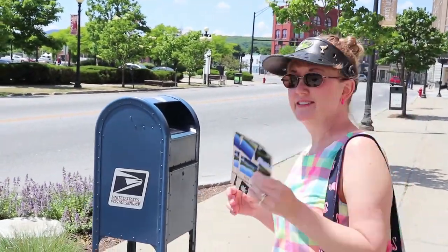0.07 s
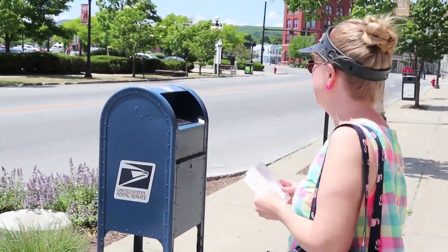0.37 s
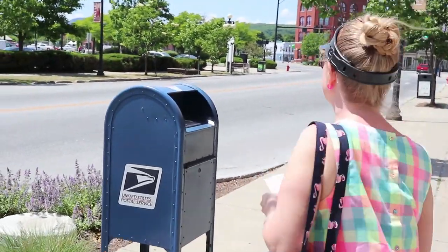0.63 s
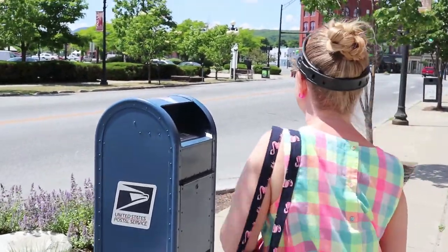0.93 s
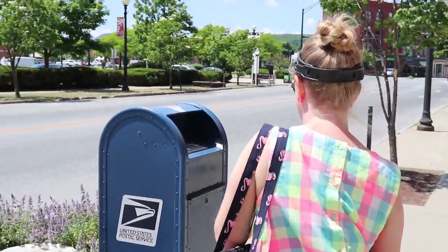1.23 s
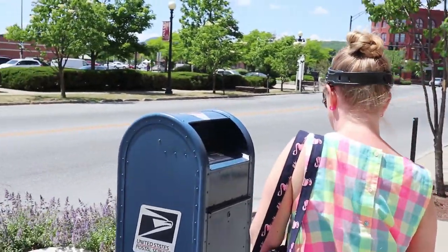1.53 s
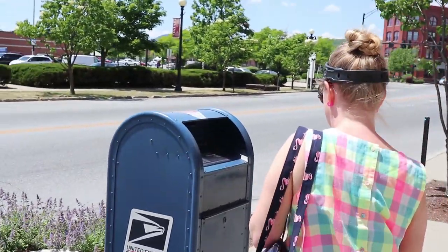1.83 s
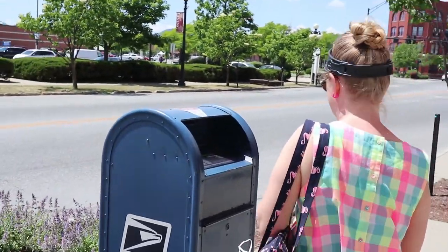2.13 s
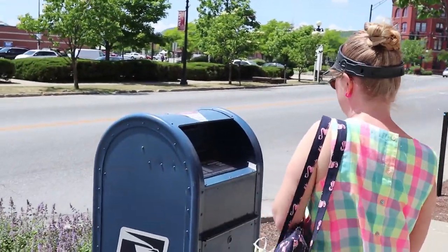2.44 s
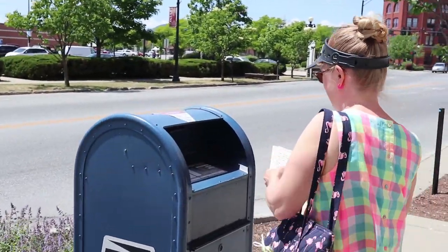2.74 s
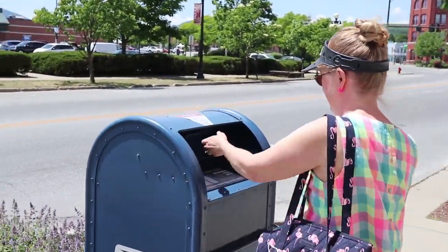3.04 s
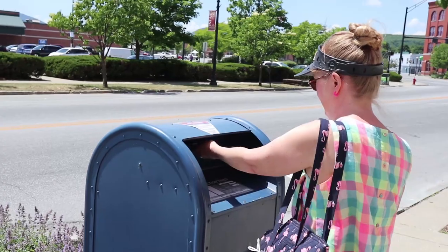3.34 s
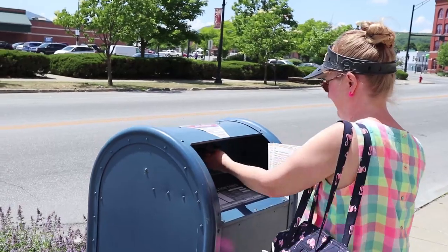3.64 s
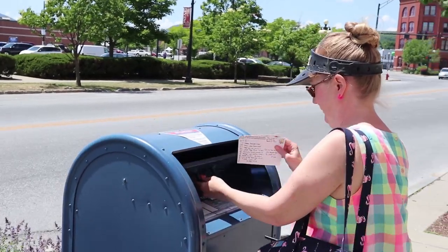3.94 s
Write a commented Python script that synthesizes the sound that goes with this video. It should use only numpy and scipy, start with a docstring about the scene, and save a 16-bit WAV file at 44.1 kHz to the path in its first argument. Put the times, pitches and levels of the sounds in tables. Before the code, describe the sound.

A steel mailbox door gives a short, high squeal over wind and faraway traffic.

```python
"""Wind buffets the microphone, close to a steel mailbox, over distant traffic and a low engine drone.
Paper and a bag rustle and tick, the door is gripped with a short scrape, then its dry hinge squeals:
a clean stick-slip tone that swells, creeps upward and jumps to a second, higher mode."""
import sys
import numpy as np
from scipy import signal
from scipy.fft import rfft, irfft
from scipy.io import wavfile
from scipy.ndimage import uniform_filter1d

SR = 44100
rng = np.random.default_rng(int(sys.argv[2]) if len(sys.argv) > 2 else 0)


def generate_wav(signal):
    """Clip the signal to [-1, 1] and save it as 16-bit WAV at the path in sys.argv[1]."""
    frames = np.transpose(np.atleast_2d(signal))
    scaled = np.clip(frames, -1, 1) * 32767
    pcm = np.round(scaled).astype(np.int16)
    wavfile.write(sys.argv[1], SR, pcm)


N = 176400
T = np.arange(N) / SR

# The hinge's two modes: (time [s], pitch [Hz], level [dB], overtone boost [dB])
LOW_MODE = [(3.79, 2630, -54, -33), (3.835, 2602, -30, -30), (3.847, 2600, -26, -20),
            (3.855, 2633, -21, -7), (3.867, 2620, -16, -4.5), (3.877, 2663, -18.5, -8),
            (3.892, 2662, -11, -4), (3.908, 2662, -17, 3), (3.922, 2670, -20, -1), (3.933, 2660, -17, -7),
            (3.943, 2620, -35, -5), (3.97, 2660, -28, -22), (4.0, 2660, -41, -25)]
HIGH_MODE = [(3.916, 2740, -45.5, 4), (3.928, 2775, -33, 0), (3.941, 2815, -24, 2),
             (3.952, 2803, -12.5, -15), (3.973, 2833, -14.5, 0.5), (3.989, 2816, -10.5, -5),
             (4.0, 2880, -15, -9.5)]
# Overtones before the boost: (multiple of the pitch, level in low mode [dB], level in high mode [dB])
OVERTONES = [(2, -19, -14), (3, -31, -24), (4, -46, -21.5), (5, -60, -42)]
# Rough contact as the modes trade places: (centre [s], half-length [s], pitch jitter [dB re 1 Hz])
MODE_JUMP = [(3.933, 0.017, 26)]

def hinge_squeal():
    """Stick-slip locks to one mode, then a higher one; overtones come in as the dry pin bites."""
    squeal = np.zeros(N)
    for mode, curve in enumerate([LOW_MODE, HIGH_MODE]):
        hz, db, bite_db = in_time(curve)
        jitter_hz = 2 * drift(80) + swells(MODE_JUMP) * drift(200)
        phase = phase_of(hz + jitter_hz)
        tone = np.sin(phase)
        for multiple, *mode_db in OVERTONES:
            overtone_db = mode_db[mode] + bite_db + 1.2 * drift(45)
            tone += from_db(overtone_db) * np.sin(round(multiple) * phase + .12 * drift(70))
        onset = np.clip((T - curve[0][0]) / .005, 0, 1)
        squeal += tone * from_db(db) * onset
    return squeal


# Reflections reaching the microphone off the box and the pavement: (delay [s], level [dB])
REFLECTIONS = [(.0031, -24), (.0074, -32), (0.014, -31)]

def at_mailbox(direct):
    """A sound heard beside the box: direct, reflected nearby, and ringing briefly in the steel."""
    echoes = sum(from_db(db) * np.interp(T - delay, T, direct) for delay, db in REFLECTIONS)
    tail = rng.standard_normal(N) * decay(0, t60_s=.12)
    ring = signal.fftconvolve(direct, tail / np.linalg.norm(tail))[:N]
    return direct + echoes + from_db(-24) * ring


# The door rubbing its frame: (centre [s], half-length [s], level [dB])
SCRAPES = [(3.451, 0.0094, -30.5), (3.461, 0.023, -31), (3.547, 0.018, -39.5), (3.563, 0.0093, -40)]
# Spectrum of the rubbing: (frequency [Hz], relative level [dB])
SCRAPE_SPECTRUM = [(250, -15), (500, 4), (800, 5), (1100, 1), (1400, -8), (2300, 4), (3000, -11),
                   (3900, -9.5), (6000, -17.5), (9500, -24.5), (15000, -45)]

def door_scrape():
    """Tiny slips against the frame rasp and set the door ringing."""
    slips = grains(per_s=6500, spread_db=3.5)
    force = swells(SCRAPES)
    ring = door_ring(force * slips) / np.std(door_ring(slips))
    return force * coloured(slips, SCRAPE_SPECTRUM) + from_db(-5.5) * ring


# Resonances of the steel door: (frequency [Hz], bandwidth [Hz], relative level [dB])
DOOR_MODES = [(840, 50, -7), (1580, 75, 2), (2100, 89, -9.5), (2300, 63, -1), (2820, 42, -11),
              (3480, 37, 3), (3900, 76, -9)]

def door_ring(slips):
    """The door's resonances answer in parallel, with alternating polarity."""
    ring = np.zeros(N)
    for k, (hz, width_hz, db) in enumerate(DOOR_MODES):
        radius = np.exp(-np.pi * width_hz / SR)
        feed = (1 - radius ** 2) / 2 * np.array([1, 0, -1])
        feedback = [1, -2 * radius * np.cos(2 * np.pi * hz / SR), radius ** 2]
        ring += (-1) ** k * from_db(db) * signal.lfilter(feed, feedback, slips + 1e-18)
    return ring


# Snaps at the handle: (time [s], relative level [dB])
SNAPS = [(3.2405, -16), (3.2418, -26)]

def handle_snaps():
    """Single impulses, heard as dry, bright clicks."""
    clicks = np.zeros(N)
    for start, db in SNAPS:
        clicks[int(start * SR)] = from_db(db)
    band = signal.butter(3, [3440, 7340], "band", fs=SR, output="sos")
    return from_db(11) * signal.sosfilt(band, clicks + 1e-18)


# Paper and cloth near the microphone: (centre [s], half-length [s], level [dB])
RUSTLES = [(.215, .012, -53), (.25, .012, -56), (.934, 0.011, -47), (1.339, .012, -47), (1.351, .006, -46),
           (1.359, 0.013, -39), (2.14, 0.12, -58), (2.81, .05, -50), (3.236, .007, -48),
           (3.415, 0.0074, -52), (3.618, 0.016, -54.5)]
# Spectrum of the rustling: (frequency [Hz], relative level [dB])
RUSTLE_SPECTRUM = [(1500, -30), (3000, 5), (4000, 3), (5500, 5.5), (8500, -3), (11000, -11), (16000, -28)]

def paper_and_bag():
    """Paper and cloth slip in short, grainy bursts."""
    return swells(RUSTLES) * coloured(grains(per_s=8900, spread_db=7.5), RUSTLE_SPECTRUM)


# Buckle and finger, close by: (time [s], level [dB], pitch [Hz])
TICKS = [(0.93, -23, 1500), (.93, -26, 3640), (1.391, -32, 4000), (2.588, -26.5, 3870)]

def buckle_and_finger():
    """Each small contact rings for a few milliseconds with an unsteady pitch."""
    ticks = np.zeros(N)
    for start, db, hz in TICKS:
        attack = np.clip((T - start) / .00038, 0, 1)
        tone = np.sin(2 * np.pi * hz * (T - start) + 1.1 * drift(300))
        ticks += from_db(db) * attack * decay(start, t60_s=.0083) * tone
    return ticks


# Wind right on the microphone: (time [s], relative level [dB])
WIND_LEVEL = [(0, -25.5), (.3, -27.5), (.4, -30.5), (.6, -32.5), (.75, -32.5), (.95, -31), (1.25, -32),
              (1.55, -29.5), (1.75, -28.5), (2.2, -27.5), (2.35, -32.5), (2.55, -34.5), (2.95, -36.5),
              (3.16, -28.5), (3.25, -20.5), (3.36, -28.5), (3.62, -29), (3.72, -33), (4, -27)]
# Gusts striking it: (centre [s], half-length [s], level [dB])
GUSTS = [(.01, .055, -16.5), (.105, 0.033, -24), (.19, 0.036, -18), (.29, 0.046, -24), (.58, .1, -24.5),
         (.92, 0.093, -27.5), (1.435, 0.047, -21.5), (1.715, .07, -23), (2.1, 0.04, -18.5),
         (2.23, .03, -24.5), (2.71, .055, -20.5), (3.238, 0.036, -16.5), (3.29, .06, -24.5)]
# Spectra of wind and gusts: (frequency [Hz], relative level [dB])
WIND_SPECTRUM = [(15, -8.5), (28, 1), (45, 1), (65, -4.5), (100, -4), (135, -11), (220, -22.5), (400, -39),
                 (1500, -77)]
GUST_SPECTRUM = [(15, -14), (30, -1), (48, -6), (68, 5), (100, -13), (140, -16.5), (220, -34.5), (500, -68),
                 (1500, -90)]

def wind():
    """Low turbulence at the microphone, with deeper gusts on top."""
    db, = in_time(WIND_LEVEL)
    return from_db(db + 1) * eddies(WIND_SPECTRUM) + swells(GUSTS) * eddies(GUST_SPECTRUM)


# Traffic in the distance: (time [s], relative level [dB])
TRAFFIC_LEVEL = [(0, -43), (.2, -43), (.45, -39.5), (.65, -40), (1.1, -39.5), (1.7, -40.5), (2.5, -40.5),
                 (3.3, -39.5), (3.6, -38), (4, -38.5)]
# Its spectrum at the mailbox: (frequency [Hz], relative level [dB])
TRAFFIC_SPECTRUM = [(20, -19), (50, 0), (100, 2), (190, -0.5), (310, -6.5), (470, -6.5), (620, -12),
                    (850, -11.5), (1250, -16), (1600, -17.5), (2200, -24), (3000, -28), (6000, -39.5),
                    (15000, -63.5)]

def traffic():
    """Far vehicles merge into a low, slightly wavering rush."""
    db, = in_time(TRAFFIC_LEVEL)
    return from_db(db + 6 + .5 * drift(17)) * noise(TRAFFIC_SPECTRUM)


# An engine in the street: (time [s], level [dB])
ENGINE_LEVEL = [(0, -40.5), (.8, -39.5), (1.15, -37), (1.6, -52), (2.6, -50), (3.1, -41.5), (3.55, -34),
                (4, -27)]

def engine_drone():
    """One low engine tone wanders in pitch and level."""
    db, = in_time(ENGINE_LEVEL)
    return from_db(db + 1.8 * drift(10)) * np.sin(phase_of(184.9 + 2.5 * drift(13)))


# Hiss along the street: (time [s], relative level [dB])
HISS_LEVEL = [(0.0, -57), (0.17, -51), (0.38, -50.5), (0.91, -48.5), (2.55, -49), (3.82, -47), (4.0, -46)]
# Its spectrum at the mailbox: (frequency [Hz], relative level [dB])
HISS_SPECTRUM = [(1500, -22), (2800, -2.5), (3700, 3.5), (4500, -6), (6000, -14.5), (8000, -17.5),
                 (11000, -18.5), (16000, -21)]

def leaves_and_tyres():
    """Leaves and tyres lay a thin, high hiss behind everything."""
    db, = in_time(HISS_LEVEL)
    return from_db(db - 2.5 + .5 * drift(14)) * noise(HISS_SPECTRUM)


def far_squeak(centre_s=.465, half_length_s=.075, db=-40):
    """One faint, wavering squeak a long way off."""
    return swells([(centre_s, half_length_s, db)]) * np.sin(phase_of(934 + 10 * drift(54)))


def from_db(db):
    """Decibels to gain."""
    return 10 ** (np.asarray(db) / 20)


def unit_power(x):
    """Scale to an RMS of 1."""
    return x / np.sqrt(np.mean(x ** 2) + 1e-20)


def phase_of(hz):
    """Running phase of a changing pitch, in radians."""
    return 2 * np.pi * np.cumsum(hz) / SR


def in_time(rows):
    """Each column after the time, interpolated to every sample."""
    times, *columns = np.transpose(rows)
    return [np.interp(T, times, column) for column in columns]


def swells(rows):
    """A smooth rise and fall in gain for each (centre [s], half-length [s], level [dB])."""
    return sum(from_db(db) * np.cos(np.pi / 2 * np.clip((T - centre) / half_length, -1, 1)) ** 2
               for centre, half_length, db in rows)


def decay(start, t60_s):
    """A gain that falls 60 dB in t60_s from its start."""
    return (T >= start) * from_db(-60 * np.clip((T - start) / t60_s, 0, 4))


def drift(rate_hz):
    """Smooth random wander with an RMS near 1, mostly slower than rate_hz."""
    hop, settle = 40, 2000
    pole = np.exp(-2 * np.pi * rate_hz * hop / SR)
    white = rng.standard_normal(N // hop + settle + 2)
    slow = signal.lfilter([1], [1, -2 * pole, pole ** 2], white)[settle:]
    return np.interp(np.arange(N) / hop, np.arange(len(slow)), unit_power(slow))


def grains(per_s, spread_db):
    """Random tiny slips of uneven size."""
    slips = (rng.random(N) < per_s / SR) * rng.choice([-1, 1], N)
    return slips * from_db(spread_db * np.clip(rng.standard_normal(N), -2, 2))


def coloured(x, spectrum):
    """Shape a steady excitation to a spectrum, rolled off below 10 Hz, at unit power."""
    hz, db = np.transpose(spectrum)
    bin_hz = np.maximum(np.arange(N // 2 + 1) * SR / N, 1)
    gain = from_db(np.interp(np.log(bin_hz), np.log(hz), db))
    low_cut = bin_hz ** 2 / (bin_hz ** 2 + 10 ** 2)
    return unit_power(irfft(rfft(x) * gain * low_cut, N))


def noise(spectrum):
    """Coloured noise of unit power."""
    return coloured(rng.standard_normal(N), spectrum)


def eddies(spectrum):
    """Turbulence of nearly even strength."""
    turbulence = noise(spectrum)
    local_power = uniform_filter1d(turbulence ** 2, size=2600)
    return turbulence / np.sqrt(local_power + .094)


def scene():
    """One microphone beside the mailbox, open to the wind, with the street behind."""
    hinge = at_mailbox(hinge_squeal())
    outdoors = wind() + traffic() + leaves_and_tyres() + engine_drone() + far_squeak()
    handling = paper_and_bag() + door_scrape() + buckle_and_finger() + handle_snaps()
    return (hinge + outdoors + handling)[None]


def record(dry, cutoff_hz=15800):
    """The microphone's signal is cut steeply at the top of the treble."""
    return signal.sosfilt(signal.ellip(12, .1, 90, cutoff_hz, fs=SR, output="sos"), dry)


dry = scene()
out = record(dry)
generate_wav(out)
```